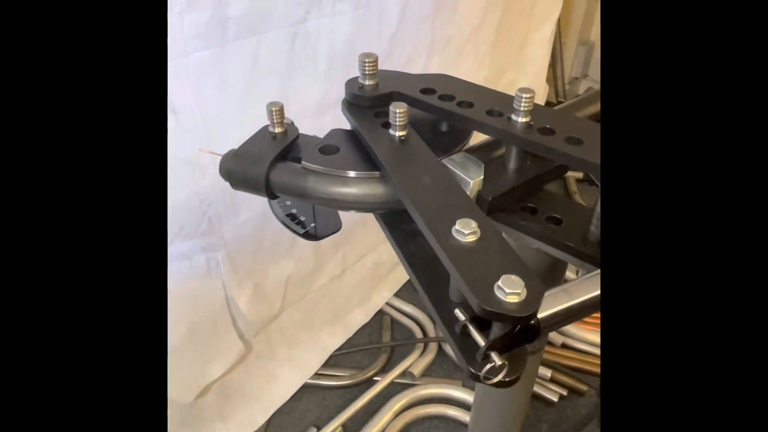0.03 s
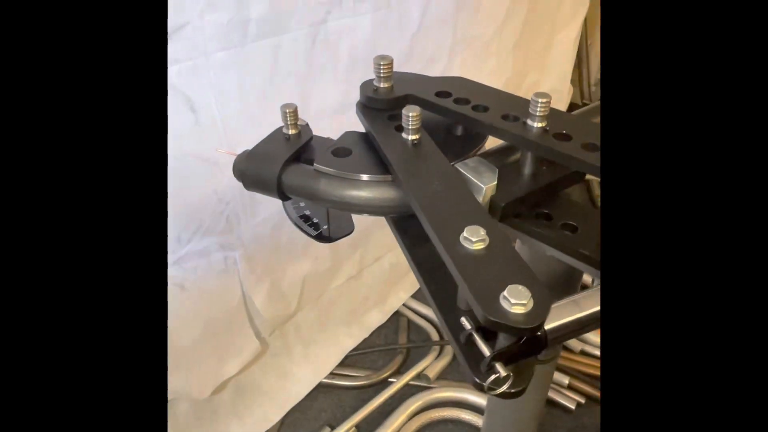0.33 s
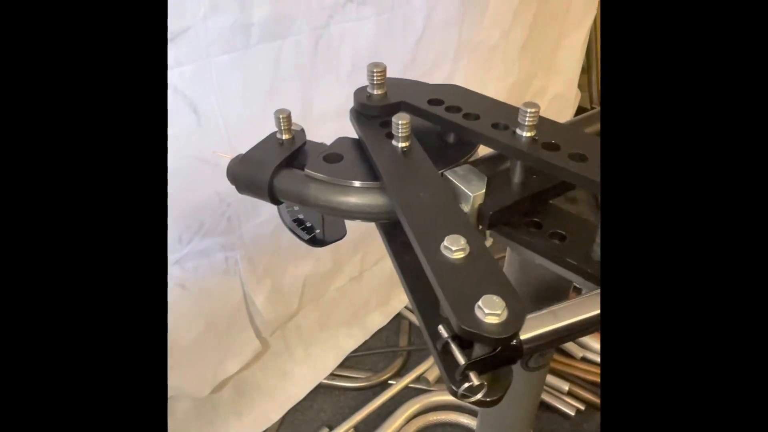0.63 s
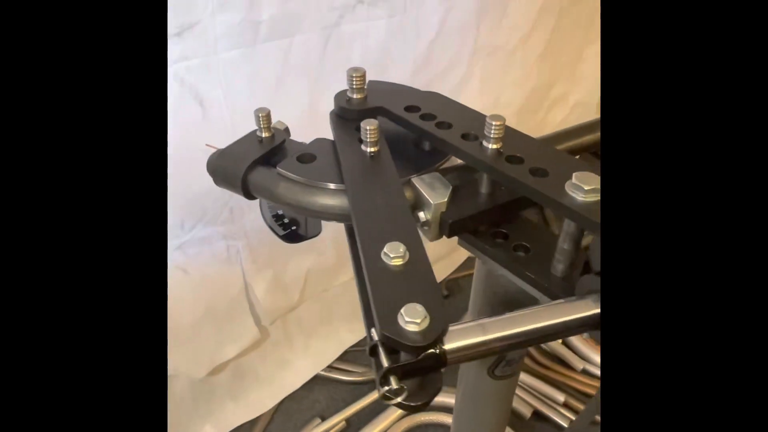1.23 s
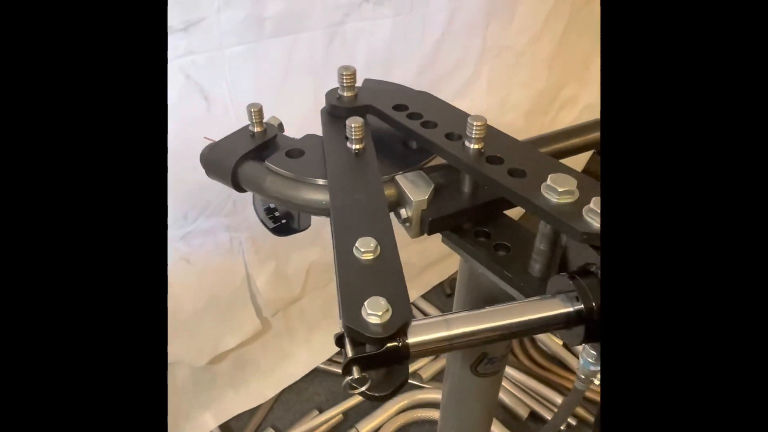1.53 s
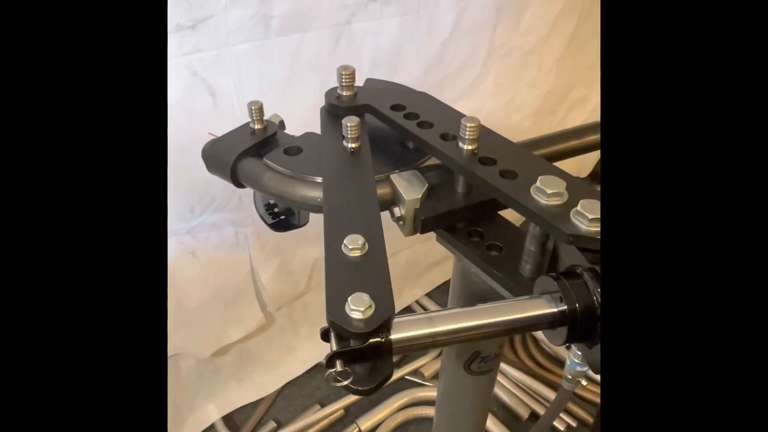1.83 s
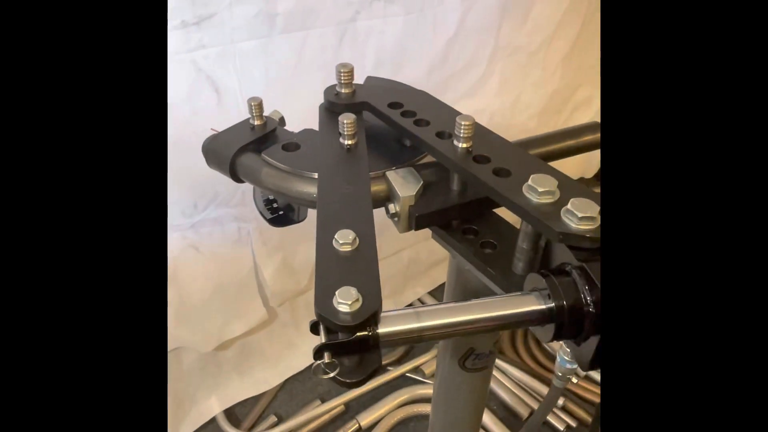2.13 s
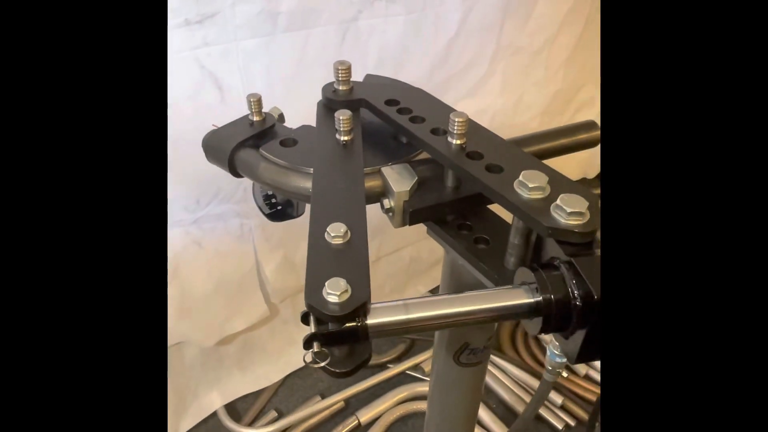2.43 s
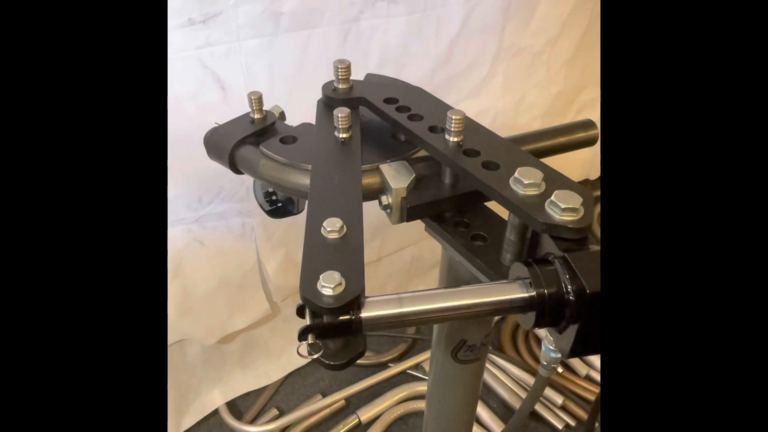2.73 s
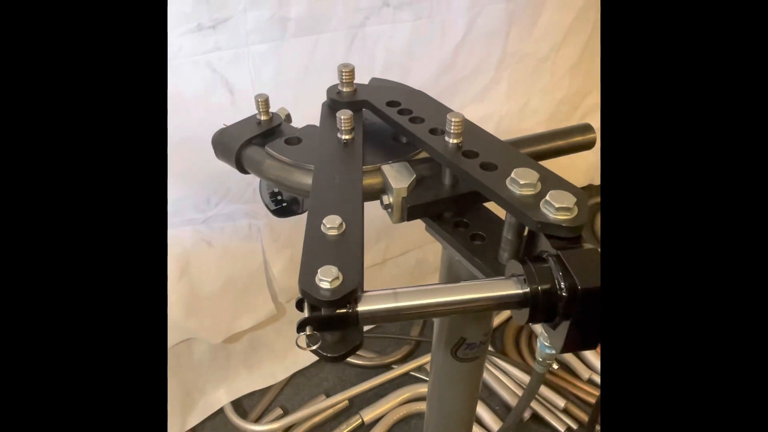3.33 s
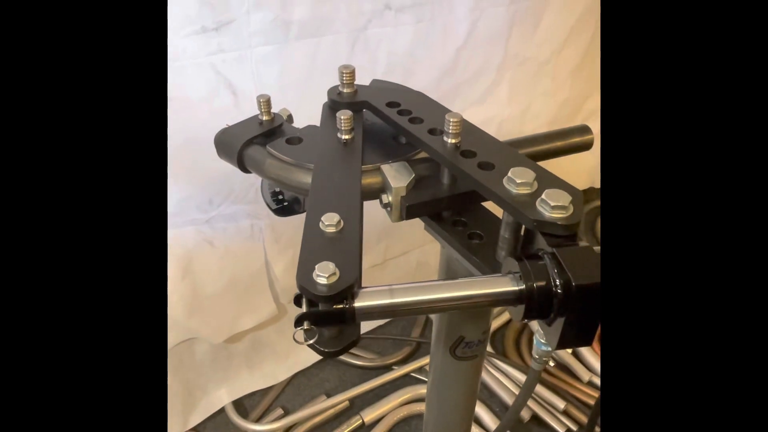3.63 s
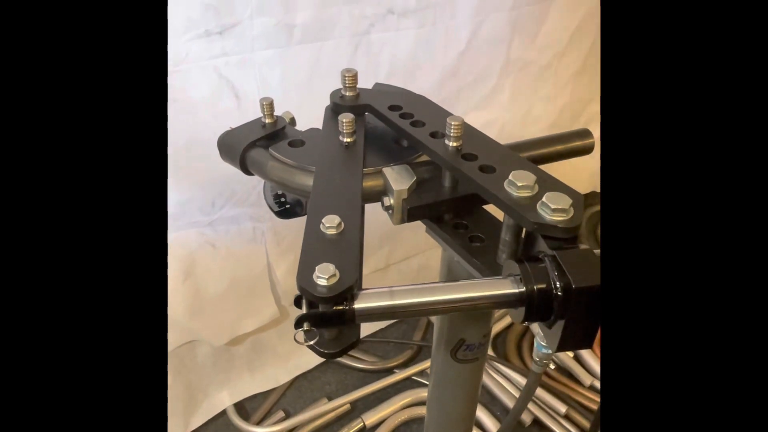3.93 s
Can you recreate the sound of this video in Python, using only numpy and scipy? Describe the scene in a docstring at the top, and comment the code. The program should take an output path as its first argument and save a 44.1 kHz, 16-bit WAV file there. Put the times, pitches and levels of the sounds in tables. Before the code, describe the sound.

Close up in a workshop, a tube bender's air-powered hydraulic pump thumps fast and evenly, slightly to the right, under a wide, pulsing hiss. Before the midpoint it briefly races twice, groaning and booming, then runs steadily again.

```python
"""An air-driven hydraulic pump hammers at about 25 strokes a second, pushing a tube bender's ram.
Close up, each stroke gives a low piston thump, a valve tick and a puff of air through the muffler.
The pump surges twice, groaning and stirring the low modes of the workshop, then settles again.
The microphone is stereo: the thump sits mostly to the right, the hiss spreads across both sides."""
import sys
import numpy as np
from scipy import signal
from scipy.fft import rfft, irfft
from scipy.io import wavfile

SR = 44100
rng = np.random.default_rng(int(sys.argv[2]) if len(sys.argv) > 2 else 0)


def waveform_to_disk(signal):
    """Save audio, clipped to [-1, 1], as 16-bit WAV at the path in sys.argv[1]."""
    frames = np.transpose(np.atleast_2d(signal))
    scaled = np.clip(frames, -1, 1) * 32767
    samples = np.round(scaled).astype(np.int16)
    wavfile.write(sys.argv[1], SR, samples)


N = 176400
LEAD = SR  # samples for which the pump has already been running
TIME = np.arange(-LEAD, N) / SR
HZ = np.fft.rfftfreq(len(TIME), 1 / SR)
USUAL_STROKE_HZ = 25.35


# Pace of the pump, with its two surges: time_s, rate_hz
STROKE_RATE = [(0, 25.28), (.95, 25.28), (1.3, 25.35), (1.38, 26.4), (1.46, 27.6), (1.53, 25.5),
               (1.61, 25.5), (1.68, 27.2), (1.75, 25.35), (2.55, 25.33), (2.8, 25.39), (3.45, 25.39),
               (3.7, 25.52), (4, 25.48)]

def pump_strokes(first_s=.0364, jitter_s=.00003):
    """The piston fires once per pump cycle, with a trace of jitter; gives the times in seconds."""
    cycles = np.cumsum(curve(STROKE_RATE)) / SR
    cycles -= np.interp(first_s, TIME, cycles)
    times = np.interp(np.arange(np.ceil(cycles[0]), cycles[-1]), cycles, TIME)
    return times + jitter_s * rng.standard_normal(len(times))


# Thump colour under light and heavy load, one value per harmonic of the usual stroke rate: gain_db
LIGHT_HARMONICS = [-70, -39.5, -39, -33.5, -28, -39, -36.5, -33.5, -34.5, -31, -39, -36, -41, -38.5, -40,
                   -61, -34, -42, -44.5, -52.5, -50.5, -50.5, -41.5, -47.5, -42.5, -51, -70, -60, -60, -69,
                   -72, -58, -59, -60]
HEAVY_HARMONICS = [-58, -36, -41, -31.5, -25.5, -34, -33, -33, -34.5, -28.5, -39.5, -38, -43, -41.5, -37.5,
                   -42.5, -36, -43, -39.5, -46.5, -60, -44, -49, -39, -45.5, -49, -56, -76, -75, -78, -62,
                   -69, -44.5, -55.5]
# Thump colour above those harmonics: frequency_hz, gain_db
THUMP_TREBLE = [(920, -64), (1150, -54.5), (1500, -71.5), (2500, -73.5), (6000, -100)]
# Where the thump sits at the microphone: frequency_hz, left_minus_right_db
THUMP_BALANCE = [(60, 1), (130, -2), (200, -4.5), (270, -1), (360, -9), (440, -6.5), (530, 4), (595, -18),
                 (680, -9), (835, -19.5), (1400, -7.5)]
# Strength of the thump: time_s, level_db
THUMP_LEVEL = [(0, -25), (1.25, -24), (1.45, -26.5), (1.75, -26.3), (1.87, -24.5), (2, -23), (4, -24)]

def piston(strokes, load_from_s=1, load_to_s=2.62, light_load_db=.3):
    """Each stroke is one tight knock on the pump body; the colour shifts as the load builds."""
    blows = rfft(pump_frame(clicks(strokes, uneven_db=.22)))

    def thump(harmonics):
        points = [(k * USUAL_STROKE_HZ, db) for k, db in enumerate(harmonics, 1)]
        return unit_rms(irfft(blows * amp(spectrum(points + THUMP_TREBLE))))

    load = curve([(load_from_s, 0), (load_to_s, 1)])
    light = amp(light_load_db) * thump(LIGHT_HARMONICS)
    in_room = workshop((1 - load) * light + load * thump(HEAVY_HARMONICS))
    pan = amp(np.outer([.5, -.5], spectrum(THUMP_BALANCE)))
    return amp(curve(THUMP_LEVEL)) * unit_rms(irfft(rfft(in_room) * pan))


# Resonances of the pump frame: pitch_hz, width_hz
FRAME_RESONANCES = [(112, 14), (148, 24), (335, 5), (405, 14), (545, 12), (620, 55), (1100, 120)]

def pump_frame(blows):
    """A blow passes at once, except at the frame's resonances, which hold it back and ring on."""
    phase_lag = sum(2 * np.arctan2(width * HZ, hz ** 2 - HZ ** 2) for hz, width in FRAME_RESONANCES)
    return irfft(rfft(blows) * np.exp(-1j * phase_lag))


# Colour of the exhaust hiss, its body and its bright top: frequency_hz, gain_db
HISS_BODY = [(30, -8), (100, -4), (300, -1.5), (750, -4.5), (1000, -5), (1300, -7), (1600, -8), (1950, -8),
             (2150, -3.5), (2400, -2), (2800, 0.5), (3400, -0.5), (3700, -4.5), (4600, -5), (5100, -10.5),
             (5750, -8), (6350, -5), (6700, -6)]
HISS_TOP = [(8000, -5.7), (9200, -7.2), (10500, -5.2), (12000, -2.8), (13000, -5), (14400, -12.3),
            (15800, -11.7)]
# Resonances of muffler and housing: pitch_hz, width_hz, lift_db
MUFFLER_RESONANCES = [(1789, 21, 9.5), (2122, 60, 7), (2567, 42, 8.5), (2820, 16, 8), (3480, 37, 7.5),
                      (4740, 32, 5), (5480, 23, 10), (5780, 70, 8.5), (6277, 96, 4.5), (7230, 70, 5),
                      (8140, 55, 12.5)]
# Swell and ebb of the hiss in a narrow middle band: time_s, gain_db
HISS_MID_GAIN = [(0, -3), (1, -1.3), (2.2, 1.5), (4, -0.92)]

def exhaust(strokes, level_db=-23.5, delay_s=.002, leak=.31, mid_hz=2180, mid_width_hz=220):
    """Air hisses and rattles through the muffler: a steady leak, and a puff after every stroke."""
    rise_s, hold_s, fall_s = .0051, .02, .012
    t = np.arange(SR // 10) / SR
    puff = np.minimum(t / rise_s, 1) * np.exp(-np.maximum(t - hold_s, 0) / fall_s)
    power = leak + signal.fftconvolve(clicks(strokes + delay_s, uneven_db=2), puff)[:len(TIME)]
    jets = (rng.standard_normal((2, len(TIME))) + [rattle(), rattle()]) * np.sqrt(abs(power))
    peaks_db = sum(db / (1 + (2 * (HZ - hz) / width) ** 2) for hz, width, db in MUFFLER_RESONANCES)
    ports = port_spectra(ring(jets, spectrum(HISS_BODY + HISS_TOP) + peaks_db))
    mid_band = irfft(ports * np.exp(-((HZ - mid_hz) / mid_width_hz) ** 2))
    hiss = irfft(ports) + (amp(curve(HISS_MID_GAIN)) - 1) * mid_band
    return amp(level_db) * unit_rms(flutter(hiss))


# Likeness of the hiss on the microphone's two sides: frequency_hz, coherence_ratio
PORT_COHERENCE = [(300, .97), (760, .7), (1200, .88), (1900, .97), (2500, .55), (3000, .72), (3500, .65),
                  (3800, .3), (4500, .25), (5700, .75), (7600, .7), (9300, .98), (10900, .98), (11600, .82),
                  (13200, .6), (14300, .97)]
# Phase lead of the left port: frequency_hz, lead_rad
PORT_PHASE = [(2150, 0), (2800, -2.6), (3550, -3.1), (4150, -5.3), (4700, -2.6), (5200, 0), (6200, .5),
              (8700, 3.05), (11000, 3.2), (13000, 4.8), (14000, 6.2)]

def port_spectra(jets):
    """The right port shares part of the left one's hiss, shifted in phase."""
    left, separate = rfft(jets)
    shared = np.clip(spectrum(PORT_COHERENCE), 0, 1)
    right = shared * left + np.sqrt(1 - shared ** 2) * separate
    return np.array([left, right * np.exp(-1j * spectrum(PORT_PHASE))])


def rattle(low_hz=5600, high_hz=14480, pitches=28, pings_per_s=600, t60_s=.014, spread_db=4):
    """Brief metallic pings of scattered pitch and size ride in the air stream."""
    t, pings = np.arange(SR // 40) / SR, 0
    for hz in np.linspace(low_hz, high_hz, pitches):
        hits = rng.random(len(TIME)) < pings_per_s / pitches / SR
        size = amp(spread_db * np.minimum(rng.exponential(1, len(TIME)), 2))
        ping = np.sin(2 * np.pi * hz * t) * amp(-60 * t / t60_s)
        pings = pings + signal.oaconvolve(hits * size, ping)[:len(TIME)]
    return amp(-8.5) * unit_rms(pings)  # relative to the hiss


# Bands in which the hiss flutters: centre_hz
FLUTTER_BANDS = [1000, 2400, 3600, 6300, 9000, 12000, 15000]

def flutter(hiss, depth_db=1.09, step_s=.05):
    """Each band of the hiss wavers in level on its own."""
    out, whole = 0, rfft(hiss)
    knots = np.arange(TIME[0], TIME[-1] + step_s, step_s)
    for share in np.eye(len(FLUTTER_BANDS)):
        waver = np.interp(TIME, knots, rng.standard_normal(len(TIME))[:len(knots)])
        band = irfft(whole * np.interp(HZ, FLUTTER_BANDS, share))
        out = out + band * amp(depth_db * waver)
    return out


# Colour of the valve tick: frequency_hz, gain_db
TICK_COLOUR = [(200, -29), (600, 3), (1100, 4.5), (1800, 5), (3000, -25), (8000, -34)]

def valve(strokes, delay_s=.009, level_db=-50.5):
    """The air valve ticks over shortly after each thump, faint and dead centre."""
    ticks = ring(clicks(strokes + delay_s, uneven_db=4.5), spectrum(TICK_COLOUR))
    return amp(level_db) * unit_rms(ticks)


# One groan at each surge: peak_s, level_db
SURGE_GROANS = [(1.45, -29), (1.69, -30)]
# Tones within a groan: pitch_hz, gain_db, delay_s
GROAN_PARTIALS = [(164.5, 0, 0.0031), (214.5, -4.5, 0), (303, -6, .03)]

def groans(swell_s=.047, rise_share_per_s=.85, left_minus_right_db=-3):
    """The surging pump groans, right of centre: low tones swell and glide up, the highest last."""
    out = np.zeros(len(TIME))
    for peak_s, level_db in SURGE_GROANS:
        for hz, gain_db, delay_s in GROAN_PARTIALS:
            t = TIME - peak_s - delay_s
            cycles = hz * (t + rise_share_per_s * t ** 2 / 2) + rng.random()
            out += amp(level_db + gain_db) * np.exp(-(t / swell_s) ** 2) * np.sin(2 * np.pi * cycles)
    return out * amp(np.array([[.5], [-.5]]) * left_minus_right_db)


# Swell and ebb of the boom in the room: time_s, level_db
BOOM_LEVEL = [(1.3, -45), (1.42, -26.5), (1.47, -25), (1.52, -38), (1.63, -24), (1.7, -27.5), (1.75, -36),
              (1.8, -27), (1.86, -32), (1.96, -55)]

def boom(pitch_hz=103):
    """A low boom hangs in the room while the pump races."""
    level = amp(np.interp(TIME, *np.transpose(BOOM_LEVEL), left=-np.inf, right=-np.inf))
    return level * np.sqrt(2) * np.sin(2 * np.pi * (pitch_hz * TIME + rng.random()))


# Low modes of the workshop around the microphone: pitch_hz, gain_db, t60_s
WORKSHOP_MODES = [(102.5, -1, 0.65), (163, -12, 0.35), (222, -3, 0.44), (303, -4, .3), (419, 3, 0.29)]

def workshop(thumps, tail_t60_s=.72, tail_db=-5, tail_top_hz=220):
    """Strokes that leave the usual rhythm stir up the room: long low modes and a dull diffuse tail."""
    t = np.arange(SR) / SR
    modes = sum(amp(db - 60 * t / t60) * np.cos(2 * np.pi * hz * t) * 2 * np.log(1000) / (t60 * SR)
                for hz, db, t60 in WORKSHOP_MODES)
    tail = rng.standard_normal((2, SR)) * amp(-60 * t / tail_t60_s)
    tail = unit_rms(tail + .57 * tail[::-1]) / np.sqrt(SR)  # left and right partly alike
    tail = signal.lfilter(*signal.butter(1, tail_top_hz, fs=SR), tail)
    off_beat = thumps - np.roll(thumps, round(SR / USUAL_STROKE_HZ))
    reverb = signal.fftconvolve(off_beat[None], modes + amp(tail_db) * tail, axes=1)
    return thumps + reverb[:, :len(thumps)]


def amp(db):
    """Decibels to gain."""
    return 10 ** (np.asarray(db) / 20)


def unit_rms(x):
    """Scales to an rms of one."""
    return x / np.sqrt(np.mean(x ** 2) + 1e-20)


def spectrum(points):
    """Reads a table on a log-frequency axis."""
    hz, value = np.transpose(points)
    return np.interp(np.log(HZ + 1), np.log(hz + 1), value)


def curve(points):
    """Reads a table over time."""
    return np.interp(TIME, *np.transpose(points))


def ring(x, gain_db):
    """Minimum-phase filter: a sharp start, then ringing."""
    log_gain = np.log(amp(np.r_[gain_db, gain_db[-2:0:-1]]))
    return irfft(rfft(x) * np.exp(np.conj(signal.hilbert(log_gain)))[:len(HZ)])


def clicks(times, uneven_db):
    """One impulse at each time, of uneven strength."""
    out = np.zeros(len(TIME))
    at = np.round(times * SR).astype(int) + LEAD
    at = at[(at >= 0) & (at < len(out))]
    out[at] = amp(uneven_db * rng.standard_normal(len(at)))
    return out


def scene():
    """Thump, tick and exhaust follow the same strokes; boom and groans come with the surges."""
    strokes = pump_strokes()
    return (piston(strokes) + valve(strokes) + exhaust(strokes) + boom() + groans())[:, LEAD:]


def record(dry, low_cut_hz=48, high_cut_hz=15950):
    """The microphone drops the deepest rumble and the highest treble."""
    low_cut = signal.butter(2, low_cut_hz, "highpass", fs=SR, output="sos")
    high_cut = signal.firwin(511, high_cut_hz, window=("kaiser", 9), fs=SR)
    return signal.oaconvolve(signal.sosfilt(low_cut, dry), high_cut[None], "same")


dry = scene()
out = record(dry)
waveform_to_disk(out)
```